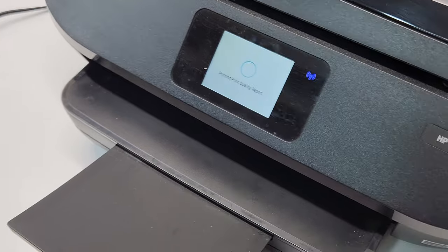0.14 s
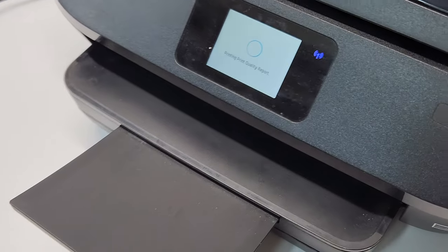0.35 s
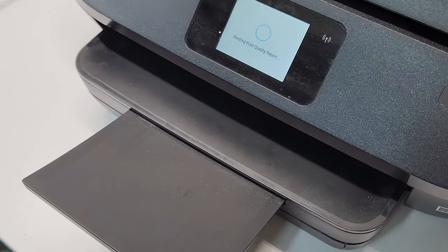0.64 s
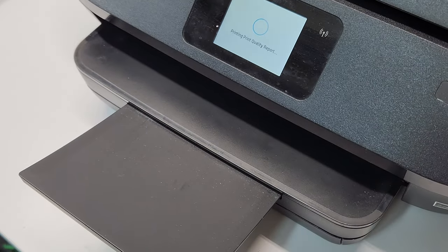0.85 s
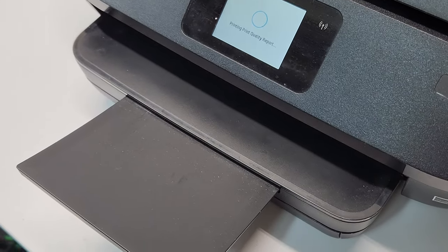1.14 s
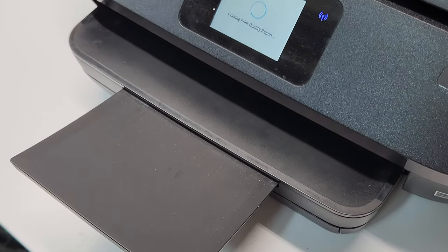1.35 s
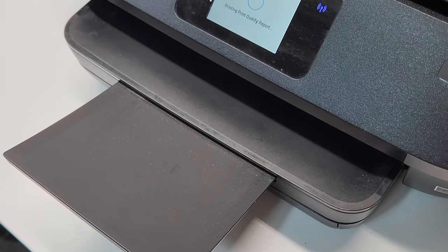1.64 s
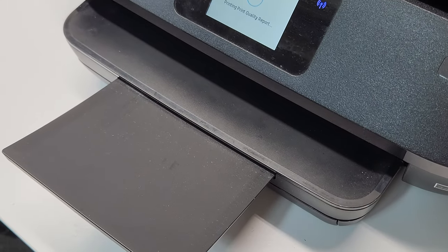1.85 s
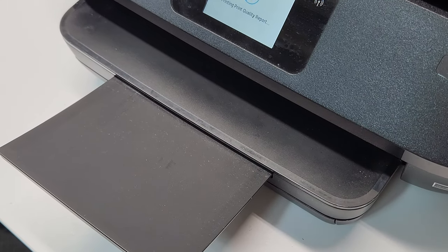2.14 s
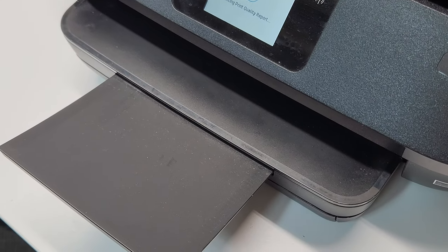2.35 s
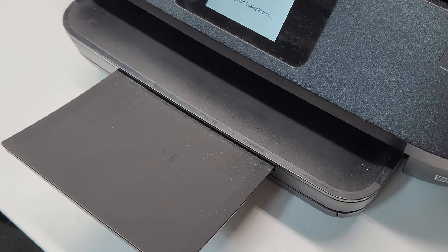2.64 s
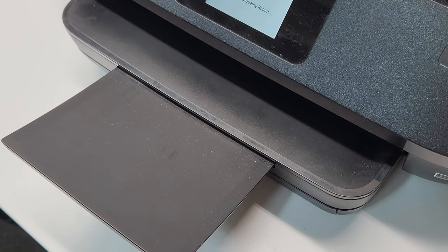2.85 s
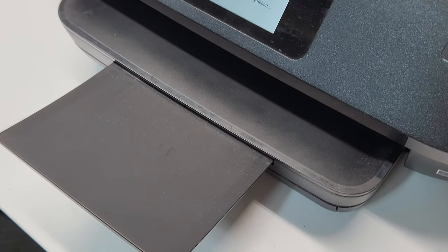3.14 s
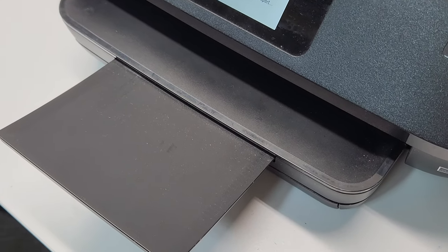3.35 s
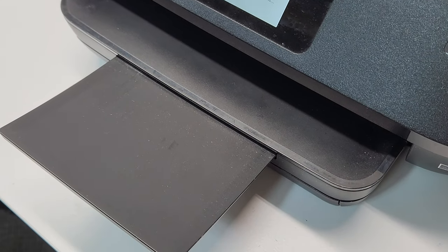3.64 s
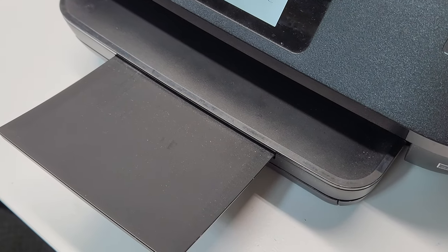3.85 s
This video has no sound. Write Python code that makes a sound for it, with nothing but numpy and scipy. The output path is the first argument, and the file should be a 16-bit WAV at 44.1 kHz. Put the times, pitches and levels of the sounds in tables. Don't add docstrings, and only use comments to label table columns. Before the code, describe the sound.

Over low room ventilation hum, a nearby printer gives one loud plastic gear rattle early, nearly falls silent, then jerks twice more with a brief whirr between, ending in faint carriage sliding and a dull room echo.

```python
import sys
import numpy as np
from scipy import signal
from scipy.fft import rfft, irfft
from scipy.io import wavfile
from scipy.ndimage import uniform_filter1d

SR = 44100
rng = np.random.default_rng(int(sys.argv[2]) if len(sys.argv) > 2 else 0)


def boost_factor(decibels):
    exponent = np.asarray(decibels, float) / 20
    return 10 ** exponent


def dump_mix(stems):
    frames = np.atleast_2d(stems).T
    limited = np.clip(frames, -1, 1)
    pcm = np.round(limited * 32767).astype(np.int16)
    wavfile.write(sys.argv[1], SR, pcm)


N = 176400
T = np.arange(N) / SR


def noise():
    return rng.standard_normal(N)


def unit(x):
    return x / np.sqrt(np.mean(x ** 2))


def colour(x, table, scale=1, edge_db=0):
    hz, db = np.array(table, float).T
    log_f = np.log(np.arange(len(x) // 2 + 1) * SR / len(x) + 1)
    gain_db = np.interp(log_f, np.log(hz), db, db[0] + edge_db, db[-1] + edge_db)
    return irfft(rfft(x) * boost_factor(scale * gain_db), len(x))


def ring(x, hz, width):
    return signal.lfilter(*signal.iirpeak(hz, hz / width, SR), x)


def hump(hz, width):
    return unit(ring(ring(noise(), hz, width), hz, width))


def rings(x, table):
    return sum((-1) ** k * boost_factor(db) * ring(x, hz, max(width, 45)) for k, (hz, width, db) in enumerate(table))


def walk(rate):
    k = int(SR / rate)
    steps = np.repeat(rng.standard_normal(N // k + 1), k)
    return unit(uniform_filter1d(uniform_filter1d(steps, k), k)[:N])


def swell(start, stop, db0, db1, attack, fall_db):
    db = np.interp(T, [start, stop], [db0, db1]) - fall_db * np.maximum(T - stop, 0)
    return boost_factor(db) * np.clip((T - start) / attack + .5, 0, 1) ** 2


def follow(table):
    return boost_factor(np.interp(T, *np.array(table).T))


def tone(hz):
    return np.sin(2 * np.pi * np.cumsum(hz) / SR)


def air(clean):
    # f/Hz, level/dB
    low_colour = [(12, -47), (20, -10), (65, 1.5), (85, -5.5), (119, 4.5), (137, -2.5), (190, -22),
                  (287, -13.5), (420, -24), (550, -75), (920, -120)]
    high_colour = [(250, -18), (420, -1.5), (673, 0), (968, -5), (1150, -5.5), (2200, -12), (3720, -22.5),
                   (5210, -27), (10500, -40), (13600, -78), (22000, -120)]
    # f/Hz, width/Hz, level/dB
    duct = [(1440, 180, -71), (5000, 780, -82.5), (7570, 920, -88.5), (8800, 1000, -100.5),
            (13200, 3300, -93.5)]
    # f/Hz, level/dB, width/Hz
    hum_lines = [(120.5, -4, 16.8), (281.5, -58.5, 10.2), (295.8, -61.5, 14)]
    # t/s, level/dB
    load = [(0, -44), (2.4, -43), (2.7, -50.5), (3.3, -49.5), (3.4, -36), (3.5, -53.5), (4, -57)]
    low = boost_factor(-45.5 + 1.37 * walk(2.33)) * unit(colour(noise(), low_colour, edge_db=-37))
    high = boost_factor(-58) * unit(colour(noise(), high_colour, edge_db=-37))
    high = high + sum(boost_factor(db) * hump(hz, width) for hz, width, db in duct)
    high = high * boost_factor(0.094 * walk(3.3) + 0.2 * walk(24.78))
    hums = [boost_factor(db) * hump(hz, width) for hz, db, width in hum_lines]
    fan = hums[0] + clean * boost_factor(0.5) * np.sin(2 * np.pi * hum_lines[0][0] * T)
    return low + high + sum(hums[1:]) + follow(load) * fan


def rumble():
    # t/s, level/dB
    boom = [(0.0, -56), (0.07, -45), (0.2, -63), (0.32, -45.5), (0.7, -57.5), (1.67, -56.5), (1.89, -59.5),
            (1.95, -42.5), (2.14, -43), (2.17, -56.5), (2.35, -41.5), (2.41, -53), (2.49, -40),
            (2.55, -49.5), (3.02, -53), (3.19, -43.5), (3.53, -61), (4.0, -56)]
    shake = [(0.0, -49), (0.05, -46), (0.17, -39.5), (0.44, -45.5), (1.84, -56.5), (2.14, -38), (2.39, -64),
             (2.43, -40), (2.67, -40), (2.71, -47), (3.98, -49), (4.0, -56)]
    return boost_factor(-2) * (follow(boom) * hump(179, 150) + follow(shake) * hump(60, 90))


def whirrs():
    # start t/s, stop t/s
    spans = [
        (-.1, .014),
        (2.153, 2.282),
    ]
    # tone level/dB, brush level/dB, mesh f/Hz
    runs = [
        (-47.5, -45.5, 1030),
        (-50.5, -47.5, 1018),
    ]
    # multiple, level/dB
    mesh = [(1, 3), (2.13, -19), (3, -17.5)]
    # f/Hz, width/Hz, level/dB
    motor_rings = [(1422, 30, 15.5), (1880, 160, 9), (2130, 120, 8), (3100, 390, -17), (5340, 680, -5.5),
                   (7940, 760, -15)]
    # f/Hz, level/dB
    brush_air = [(710, -11.5), (1200, -7.5), (1620, -21.5), (2190, -31), (2480, -15), (5790, -25.5),
                 (10000, -29.5), (15500, -38)]
    wobble, flutter = walk(60), [walk(90) for _ in mesh]
    wheel_hz, wheel_peak_s = 20.4, 2.2255
    slack = np.minimum(2 * np.cos(2 * np.pi * wheel_hz * (T - wheel_peak_s)) + 1, 0)
    grip = boost_factor(-12 * slack * slack)
    frame = unit(rings(noise(), motor_rings[:4]))
    brush = boost_factor(-11.5) * unit(rings(noise(), motor_rings[4:]))
    brush = brush + boost_factor(-3.0) * unit(colour(noise(), brush_air, edge_db=-2.5))
    lead_s = 0.017
    out = 0
    for (a, b), (db, brush_db, hz) in zip(spans, runs):
        phase = 2 * np.pi * np.cumsum(hz * (1 + .009 * wobble)) / SR
        teeth = sum(boost_factor(g + 2.5 * w) * np.sin(k * phase) for (k, g), w in zip(mesh, flutter))
        gears = (teeth + boost_factor(-8) * frame) * grip
        out = out + swell(a, b, db, db, attack=.008, fall_db=801) * gears
        out = out + swell(a - lead_s, b - lead_s, brush_db, brush_db, attack=0.071, fall_db=330) * brush
    return out


def sprays():
    bursts = [
        (0.013, 0.143, -79, -67.5, 0.015),
        (0.372, 0.507, -75, -68.5, 0.023),
        (1.097, 1.49, -68, -86, 0.61),
        (2.804, 3.273, -76, -83, 0.24),
    ]
    # f/Hz, level/dB
    hiss_colour = [(2500, -10), (5000, 4), (6300, -7), (7600, -1), (10000, -8), (12000, -18), (15500, -18)]
    return sum(swell(*row, fall_db=297) for row in bursts) * unit(colour(noise(), hiss_colour, edge_db=-11))


def belt_whine():
    u = (T - 0.085) / 0.047
    hz = 13800 - 1410 * np.minimum(u ** 2, 2)
    return boost_factor(-80 + 1.5 * walk(300)) * np.clip(3 * (1 - abs(u)), 0, 1) * tone(hz)


def knocks():
    # f/Hz, level/dB, t60/s
    latch = [(2140, 1, 0.023), (3470, -4, 0.038), (3670, -7, 0.018), (4800, -9.5, 0.038), (7600, -12, 0.02),
             (13100, -35, .015)]
    clutch = [(578, -3.5, 0.041), (1110, 0.5, 0.017), (1448, -5, 0.12), (1807, -8, 0.078), (2265, 3, 0.014),
              (2620, 0.5, 0.008), (3300, -9.5, 0.03), (3810, -11, 0.041)]
    stop = [(890, 4.5, 0.041), (1374, 6, 0.048), (2730, 0.5, 0.027), (6240, -7, 0.016), (7400, 2, 0.02),
            (10860, -8, 0.025)]
    # t/s, level/dB, brightness/(dB per octave)
    latch_hits = [
        (.098, -44.5, 0),
        (.104, -39.5, 1),
    ]
    clutch_hits = [
        (0.267, -29.5, 0),
        (.271, -30.5, -6),
        (1.9389, -38.5, 1),
        (2.037, -42.5, -3.5),
        (2.4441, -32, -3.5),
        (2.453, -42.5, 5),
        (2.4991, -34.5, 3.5),
    ]
    stop_hits = [
        (.347, -57, -1.3),
        (1.979, -37, 1),
        (1.983, -41, -1.7),
        (2.51, -44.5, 3),
    ]
    # centre f/Hz, width/Hz, level/dB, decay/s
    cracks = [
        (4340, 3300, 4.5, 0.0013),
        (2320, 3700, 4, 0.014),
        (7500, 9700, 9.5, 0.0035),
    ]
    size = 8192
    out, t = np.zeros(N + size), T[:size]
    parts = zip((latch, clutch, stop), (latch_hits, clutch_hits, stop_hits), cracks)
    for modes, hits, (hz, width, crack_db, decay) in parts:
        f, g, t60 = np.array(modes).T[:, :, None]
        for s, db, tilt_db in hits:
            level_luck, pitch_luck, sign_luck = rng.standard_normal((3, len(modes), 1))
            level = boost_factor(g + 0.29 * level_luck + tilt_db * np.log2(f / 2000) - 60 * t / t60)
            body = level * np.sign(sign_luck) * np.sin(2 * np.pi * f * (1 + .012 * pitch_luck) * t)
            crack = ring(ring(rng.standard_normal(size), hz, width), hz, width)
            crack = crack * np.exp(-t / decay) * boost_factor(crack_db + tilt_db)
            at = int(s * SR)
            out[at:at + size] += boost_factor(db) * (body.sum(axis=0) + crack)
    return out[:N]


def drag():
    pull = (.106, .262, -55, -57, .004)
    # f/Hz, level/dB
    slide_colour = [(1400, -3), (2050, 2), (2600, -3), (3300, -1.5), (4100, -17), (4850, -9), (6000, -26),
                    (7600, -19)]
    rub = boost_factor(1.4 * walk(54)) * unit(colour(noise(), slide_colour, edge_db=-22))
    return swell(*pull, fall_db=297) * rub


def ticks():
    # t/s, level/dB, f/Hz, second f/Hz
    clicks = [
        (.1585, -66, 7500, 13500),
        (3.265, -68, 9300, 7800),
    ]
    size = 8192
    out, t = np.zeros(N + size), T[:size]
    for s, db, *pair in clicks:
        click = sum(np.sin(2 * np.pi * f * t) + ring(rng.standard_normal(size), f, f / 2) for f in pair)
        at = int(s * SR)
        out[at:at + size] += boost_factor(db) * click * np.exp(-t / 0.0037)
    return out[:N]


def jerks():
    # start t/s, stop t/s
    spans = [
        (.265, .345),
        (1.92, 1.986),
        (2.445, 2.5),
    ]
    # start level/dB, stop level/dB, extra hiss/dB
    levels = [
        (-34.5, -33.5, 1),
        (-36, -34, 6),
        (-36.5, -34, 7.5),
    ]
    # f/Hz, width/Hz, level/dB
    case_rings = [(453, 160, -4), (521, 52, 3.5), (589, 33.4, 1.5), (893, 30, 4), (1178, 35, -4.5),
                  (1405, 40, -3), (2160, 80, -12), (2620, 36, -11), (3180, 62, -29)]
    # f/Hz, level/dB
    rattle = [(59, -23), (100, 2), (299, -12), (584, -17), (1400, -4), (2040, -15), (5140, -22),
              (6000, -20), (7800, -52), (13200, -120)]
    hiss_colour = [(1000, -21), (3000, 4.5), (5300, 2.5), (6500, -1.5), (7600, -1), (11000, -7.5),
                   (15500, -10)]
    teeth_per_s, scatter_db, late_s = 4000, 2.2, .014
    struck = rng.random(N) < teeth_per_s / SR
    teeth = struck * np.sign(noise()) * boost_factor(scatter_db * rng.exponential(size=N))
    push, rub = 0, 0
    for (a, b), (d0, d1, extra) in zip(spans, levels):
        push = push + swell(a, b, d0, d1, attack=.006, fall_db=590)
        rub = rub + swell(a + late_s, b, d0 + extra, d1 + extra, attack=2 * late_s, fall_db=442)
    steady = rings(teeth, case_rings)
    case = rings(teeth * push, case_rings) / np.sqrt(np.mean(steady ** 2))
    box = push * unit(colour(teeth, rattle, edge_db=-26))
    hiss = rub * boost_factor(1.8 * walk(86)) * unit(colour(noise(), hiss_colour))
    return case + box + boost_factor(-10) * hiss


def catches(phase):
    # t/s, level/dB, f/Hz
    dull = [(0.274, -21, 547), (0.31, -21, 546), (0.318, -15.5, 840), (0.325, -23, 594), (0.334, -25, 750),
            (0.344, -22.5, 592), (0.351, -24, 566), (1.928, -29, 880), (1.94, -27, 650), (1.944, -25, 589),
            (1.954, -22, 620), (1.959, -25, 526), (1.967, -19.5, 1007), (1.972, -21, 608),
            (1.983, -26, 880), (2.453, -22.5, 826), (2.469, -21, 587), (2.476, -21.5, 805),
            (2.484, -20.5, 1100), (2.49, -19.5, 598), (2.499, -23.5, 441)]
    # t/s, level/dB, f/Hz
    bright = [
        (.2668, -18.5, 3500),
        (.2672, -24, 1800),
        (.267, -23.5, 1090),
        (.344, -30, 3000),
        (2.4452, -18, 1480),
        (2.4442, -19.5, 2750),
    ]
    size = 4096
    out, t = np.zeros(N + size), T[:size]
    for table, t60 in ((dull, 0.037), (bright, .016)):
        for s, db, hz in table:
            level = boost_factor(db - 2 - 60 * t / t60) * (1 - np.exp(-t / .001))
            at = int(s * SR)
            out[at:at + size] += level * np.sin(2 * np.pi * hz * t + phase)
    return out[:N]


def slides():
    strokes = [
        (0.42, 0.495, -58.5, -57.5, 0.0077),
        (2.64, 3.274, -67, -66.5, 0.09),
    ]
    # f/Hz, level/dB
    rod = [(600, 5), (1200, -8), (2300, -6.5), (3400, -1.5), (4100, -8.5), (5000, -9), (5800, -15.5),
           (12000, -29)]
    rub = boost_factor(1.0 * walk(41.15)) * unit(colour(noise(), rod, edge_db=-8))
    return sum(swell(*row, fall_db=297) for row in strokes) * rub


def moans():
    drives = [
        (.42, .57, -58, 480, 560),
        (3.0, 3.3, -67, 500, 540),
    ]
    out = 0
    for a, b, db, hz0, hz1 in drives:
        level = swell(a, b, db, db, attack=0.021, fall_db=297) * boost_factor(3.5 * walk(29.4))
        out = out + level * tone(np.interp(T, [a, b], [hz0, hz1]))
    return out


def squeals():
    partials = [(2.152, 2.168, -52, 1400, 1390), (2.152, 2.166, -54, 1880, 1860),
                (2.153, 2.2, -51, 2270, 2140), (2.152, 2.19, -56, 3030, 3080),
                (2.202, 2.243, -53, 1770, 1810), (2.205, 2.245, -53, 2180, 2290),
                (2.222, 2.25, -56, 3050, 3090), (2.264, 2.284, -56, 2130, 2180)]
    out = 0
    for a, b, db, hz0, hz1 in partials:
        level = swell(a, b, db, db, attack=.006, fall_db=1200) * boost_factor(5 * walk(110))
        out = out + level * tone(np.interp(T, [a, b], [hz0, hz1]) * (1 + .022 * walk(80)))
    return out


def echo(x):
    size = 8192
    tail = rng.standard_normal(size) * boost_factor(-60 * T[:size] / 0.32)
    tail = tail / np.sqrt(np.sum(tail ** 2))
    return boost_factor(-11) * signal.lfilter(*signal.butter(1, 3020, fs=SR), signal.fftconvolve(x, tail)[:N])


def printer(phase):
    moving = whirrs() + sprays() + belt_whine() + knocks() + drag() + ticks()
    moving = moving + jerks() + catches(phase) + slides() + moans() + squeals()
    return moving + echo(moving)


def scene():
    # f/Hz, level/dB
    case_side = [(110, -25), (380, -11.5), (700, -8), (1290, -4), (2400, -1), (15000, 0)]
    air_side = [(60, -17), (110, -24), (200, -11.5), (380, -7), (1290, 1), (15000, -1)]
    # f/Hz, level/dB
    tilt = [(200, 1.2), (700, 2), (2400, 1.5), (4400, 1), (8100, -1.5), (15000, -1.2)]
    pad = np.zeros(4096)
    near = np.append(printer(0) + rumble(), pad)
    side = colour(np.append(printer(np.pi / 2), pad), case_side)
    room, room_side = air(1.0), colour(air(0), air_side)
    left = colour(near + side, tilt, 1 / 2)[:N] + room + room_side
    right = colour(near - side, tilt, -1 / 2)[:N] + room - room_side
    return np.array([left, right])


def band_limit(x):
    return signal.sosfilt(signal.butter(12, 15960, fs=SR, output="sos"), x)


def record(dry):
    steep = signal.ellip(8, .2, 50, 16000, fs=SR, output="sos")
    mix = signal.sosfilt(steep, dry)
    return band_limit(mix)


dry = scene()
out = record(dry)
dump_mix(out)
```